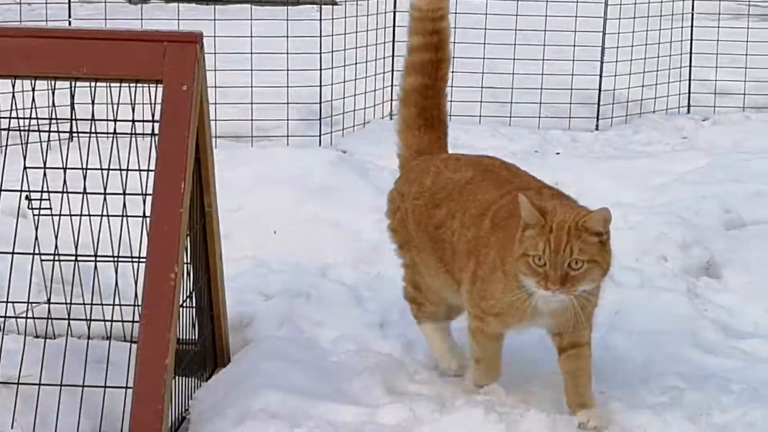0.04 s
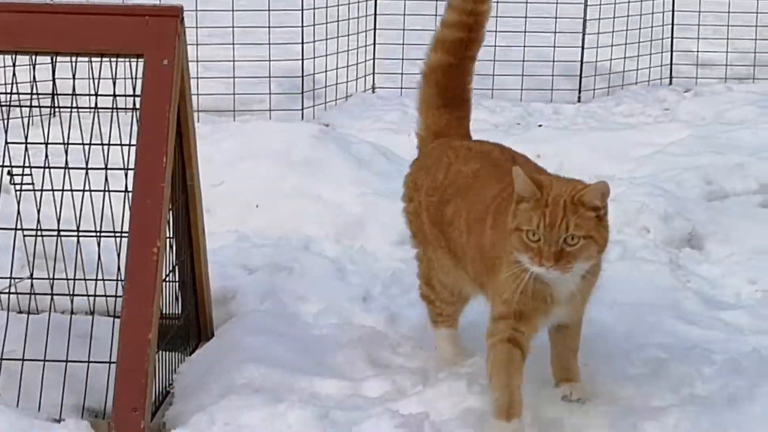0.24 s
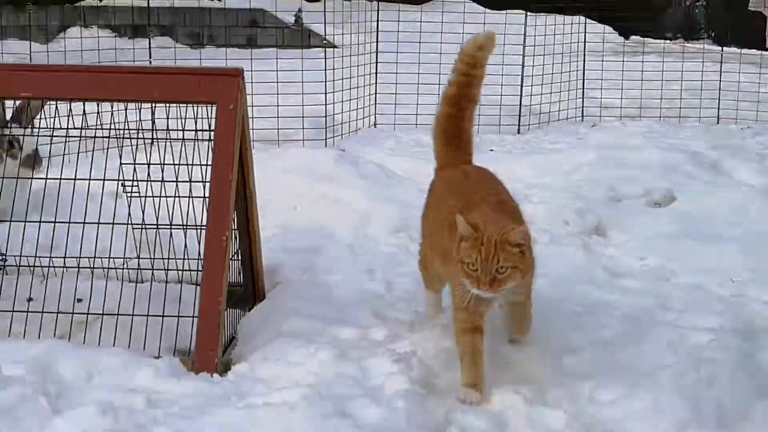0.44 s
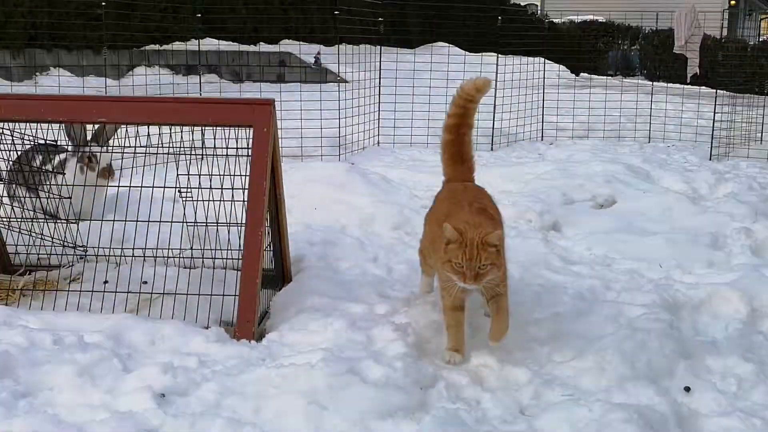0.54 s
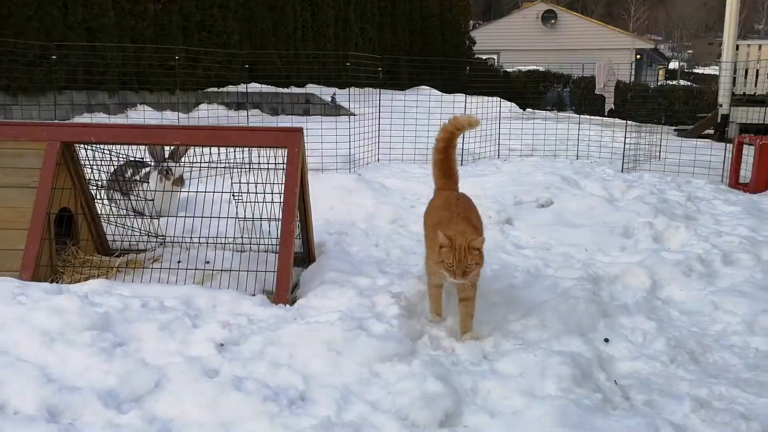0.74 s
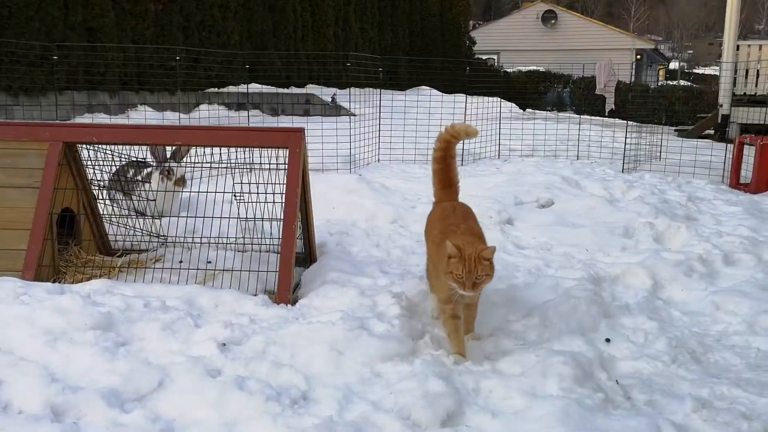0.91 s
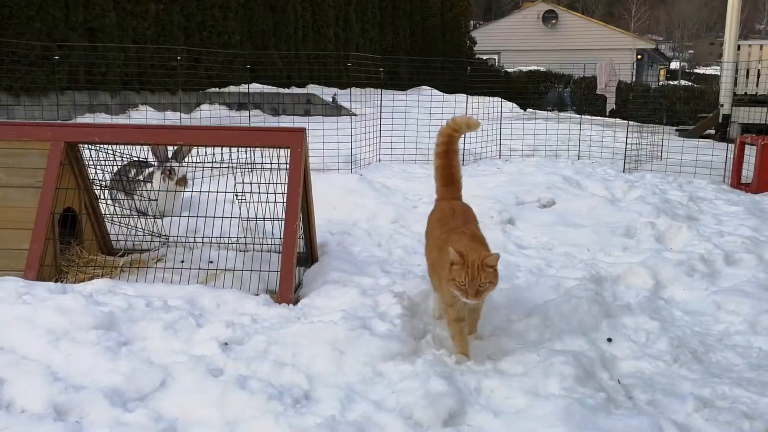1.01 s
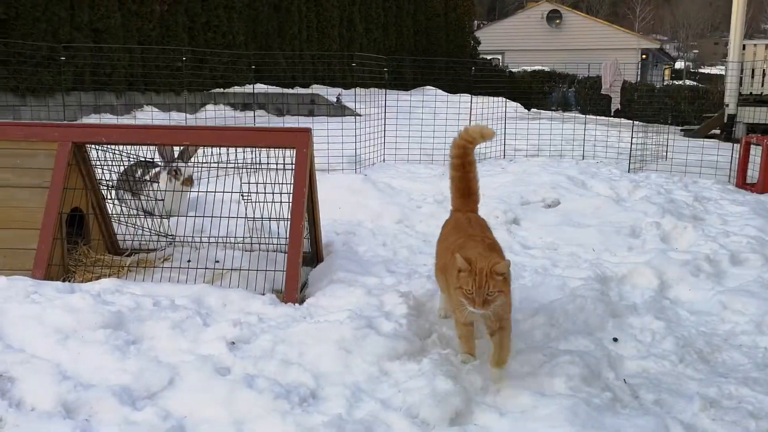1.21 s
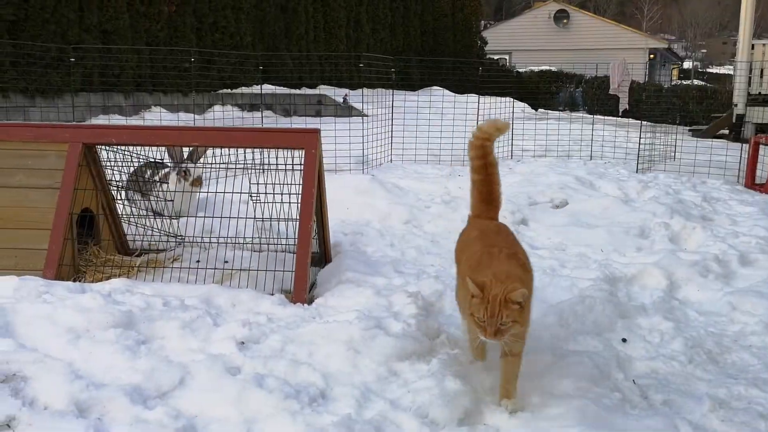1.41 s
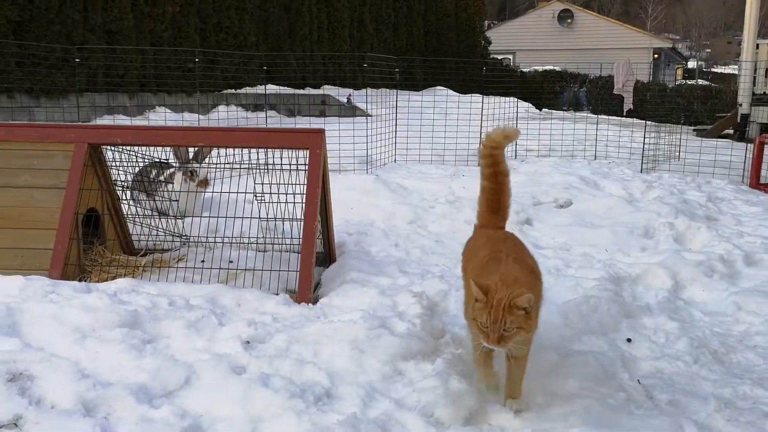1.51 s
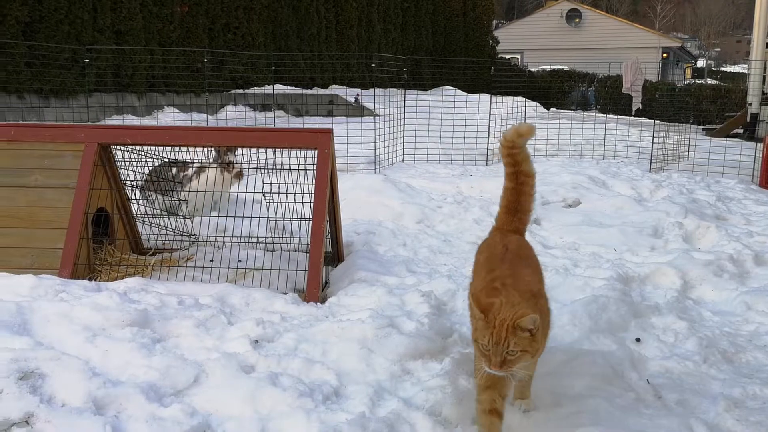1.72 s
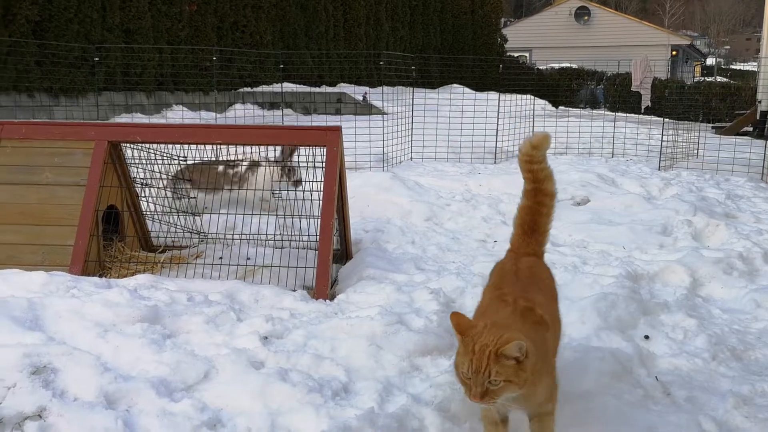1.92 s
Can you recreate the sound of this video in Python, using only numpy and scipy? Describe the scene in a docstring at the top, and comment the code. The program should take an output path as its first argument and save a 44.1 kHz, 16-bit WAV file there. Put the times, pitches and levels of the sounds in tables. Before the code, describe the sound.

Camera handling noise: a low bump and click, then a short rub and faint ticks.

```python
"""A fingertip lands on a hand-held camera: the case rings with a click and sways with a deep thump.
The skin sticks and slips as it slides across twice, then the grip settles with ticks, scuffs and bumps.
The fingers are beside the right microphone, so the left one hears them later and duller.
Behind this is the faint rush of a quiet garden, where a cat's paws crunch in the snow."""
import sys
import numpy as np
from scipy import signal
from scipy.fft import rfft, irfft, next_fast_len
from scipy.io import wavfile
from scipy.ndimage import uniform_filter1d

SR = 44100
rng = np.random.default_rng(int(sys.argv[2]) if len(sys.argv) > 2 else 0)


def dump_mix(stems):
    """Bounce the given channels to the path in sys.argv[1] as a 16-bit WAV at rate SR."""
    frames = np.atleast_2d(stems).T  # one column per channel
    limited = np.clip(frames, -1, 1)  # hard clip at full scale
    pcm = np.round(limited * 32767).astype(np.int16)
    wavfile.write(sys.argv[1], SR, pcm)


N = 85995
T = np.arange(N) / SR

# tone of the outdoor air: frequency_hz, gain_db
AIR_TONE = [(150, -30.5), (250, -4), (302, -6.5), (427, -10), (614, -9.5), (867, -6), (1100, -11),
            (1180, -14), (1890, -15), (4100, -26), (7250, -28), (15500, -39)]
# loudness of the air: time_s, level_db
AIR_LOUDNESS = [(0, -66), (0.8, -67), (1.15, -68), (1.5, -68.5), (1.8, -66), (1.95, -67)]
# how alike the air is in both microphones: frequency_hz, likeness (1 same, -1 opposite)
AIR_LIKENESS = [(250, 0.35), (640, -0.61), (1400, 0.13), (8000, -0.15)]
# how much louder the air is on the left: frequency_hz, gain_db
AIR_BALANCE = [(250, 2), (700, -4), (1300, -4), (2400, -2), (4400, 0), (8000, 3), (15000, -1)]
# the cat's steps: peak_s, level_db
PAW_STEPS = [(0.049, -79), (0.742, -83.5), (0.779, -81), (0.95, -84), (1.045, -83), (1.33, -83.5),
             (1.81, -80)]
# tone of crunching snow: frequency_hz, gain_db
SNOW_TONE = [(3000, -31), (5500, 4), (8800, 4.5), (10500, -22), (15000, -30.5)]
# loudness of the hand's rumble: time_s, level_db
RUMBLE_LOUDNESS = [(0, -47.5), (0.035, -44.5), (0.06, -38), (0.19, -30.5), (0.28, -37.5), (0.35, -46.5),
                   (1.0, -47), (1.4, -49), (1.55, -47), (1.95, -51)]
# tone of that rumble: frequency_hz, gain_db
RUMBLE_TONE = [(10, -13.5), (25, 7), (42, 1.5), (70, -5.5), (110, -14), (160, -27.5), (240, -31),
               (350, -41.5), (700, -37.5), (2000, -70.5)]
# scuffs of a shifting finger: peak_s, level_db, fade_s (every fade or swell time spans 60 dB)
FINGER_SCUFFS = [(0.418, -58, 0.14), (1.289, -59, 0.11), (1.306, -55, 0.16), (1.434, -59, 0.077),
                 (1.685, -62.5, 0.45), (1.816, -61, 0.42)]
# tone of a scuff: frequency_hz, gain_db
SCUFF_TONE = [(60, -22), (130, 8), (230, 2), (400, -9.5), (650, -11.5), (1000, -9.5), (1500, -27),
              (3000, -29), (8000, -48)]
# what the left microphone loses of any rubbing: frequency_hz, gain_db
LEFT_SHADOW = [(300, -6.5), (700, -10), (1300, -16.5), (2400, -17), (4400, -21.5), (8000, -7.5)]
# ticks of a seam in the case: start_s, level_db
SEAM_TICKS = [(1.7536, -53.5), (1.7884, -43.5), (1.8962, -55.5)]
# notes the seam rings at: pitch_hz, gain_db, fade_s
SEAM_NOTES = [(920, -4.5, 0.016), (1700, -2, 0.013), (2080, 0.5, 0.013), (2530, -1.5, 0.009)]
# loudness of the sliding fingertip, one list per stroke: time_s, level_db
SLIDE_STROKES = [
    [(0.129, -39.5), (0.142, -48), (0.18, -50.5), (0.22, -52), (0.255, -50.5), (0.3, -51), (0.325, -55.5),
     (0.365, -53), (0.43, -59.5), (0.475, -64.5), (0.5, -97)],
    [(0.515, -88), (0.54, -64), (0.58, -62), (0.63, -72.5), (0.68, -67.5), (0.74, -83)],
]
# tone of rubbing skin: frequency_hz, gain_db
RUB_TONE = [(150, -10), (350, -7.5), (620, 2), (850, -1), (1250, -2), (1700, -0.5), (2300, 0.5), (2800, -4),
            (3150, -12.5), (4500, -23), (7500, -27.5), (9500, -39.5), (12000, -37), (15000, -40)]
# tone of hard-pressed skin: frequency_hz, gain_db
SQUEEZE_TONE = [(2500, 2), (4000, 5), (6000, -5.5), (7700, 2.5), (9000, -15.5), (12000, -8), (15000, -30)]
# the skin snapping free: start_s, level_db
SKIN_SNAPS = [(0.2382, -25.5)]
# tone of the snap: frequency_hz, gain_db
SNAP_TONE = [(1000, -16), (4000, -1), (9000, -3.5), (12500, -6.5), (15000, -23.5)]
# bumps of the grip that start at once, some as strong as the thumps: start_s, level_db, pitch_hz, fade_s
GRIP_BUMPS = [(0.054, -28.5, 81, 0.08), (0.1223, -13, 96, 0.014), (0.1324, -13, 167.3, 0.022),
              (0.197, -35.5, 260, .02), (0.208, -28.5, 155, 0.029), (0.2446, -10, 81.6, 0.029),
              (0.293, -36.5, 95.4, 0.089), (0.517, -39, 47.7, 0.14), (0.631, -37, 75, 0.064),
              (0.749, -43.5, 140, 0.019), (0.777, -37, 41.4, 0.18), (1.285, -49, 119, 0.063),
              (1.308, -46.5, 132, 0.061), (1.681, -40, 131, 0.074), (1.715, -39, 42.1, 0.25),
              (1.84, -43, 123, 0.063)]
# heavy jolts of the case: peak_s, level_db, pitch_hz, swell_s, fade_s
HEAVY_THUMPS = [(0.1, -23.5, 30.9, 0.22, 0.15), (0.1433, -7.5, 51.7, 0.059, 0.048),
                (0.16, -20, 34.5, 0.01, 0.2), (0.2382, -18.5, 52.7, 0.029, 0.07),
                (0.266, -26, 24.7, 0.013, 0.133), (0.347, -31.5, 48.5, 0.074, 0.093)]
# notes the case rings at: pitch_hz, gain_db, fade_s
CASE_NOTES = [(389, -15.5, 0.022), (625, -2.5, 0.014), (1106, 1, 0.0074), (1460, 3.5, 0.0047),
              (1910, -13, 0.014), (2350, -4, 0.011), (3760, -21.5, 0.013), (4370, -21.5, 0.0047)]
# middles of the case's low, middle and high range: pitch_hz
CASE_RANGES = [650, 1346, 2350]
# taps and how hard they ring each range: start_s, low_db, middle_db, high_db, left_cutoff_hz
FINGER_TAPS = [(0.1174, -26.5, -37.5, -32.5, 376), (0.129, -18, -17, -19.5, 317),
               (0.7495, -38.5, -46.5, -69, 322)]

LEFT_DELAY_MS, TOP_HZ = 0.624, 15750
PAW_WIDTH_S, CRYSTALS_PER_S, PAW_LEFT_DB = 0.018, 1600, 10
SCUFF_SWELL_S, BUMP_RISE_S = 0.053, 0.0022
SEAM_CUTOFF_HZ, SEAM_LEFT_CUTOFF_HZ = 2700, 990
SLIPS_PER_S, RUB_FLUTTER_DB, SNAP_LEFT_DB = 4000, 1, -39
SQUEEZE_PEAK_S, SQUEEZE_WIDTH_S, SQUEEZE_DB = 0.264, 0.018, -60.5
CRACK_GAIN_DB, CRACK_FADE_S = -29.5, 0.013
FINGERTIP_CUTOFF_HZ, FINGERTIP_STEEPNESS = 5000, 12


def amp(db):
    """Turn decibels into a number to multiply by."""
    return 10 ** (np.asarray(db) / 20)


def unit(x):
    """Scale a sound so its average strength (rms) is 1."""
    return x / np.sqrt(np.mean(x ** 2) + 1e-20)


def along(points, hz):
    """Read between (frequency_hz, value) points, with octaves evenly spaced."""
    frequencies, values = np.transpose(points)
    return np.interp(np.log(hz + 1), np.log(frequencies + 1), values)


def loudness(points):
    """A gain that follows (time_s, level_db) points and is silent outside them."""
    times, levels = np.transpose(points)
    return amp(np.interp(T, times, levels, left=-120, right=-120))


def fade(t, fade_s):
    """Silent before t = 0, then dying away by 60 dB every fade_s."""
    return (t >= 0) * np.exp(-np.log(1000) * np.abs(t) / fade_s)


def swell_and_fade(t, swell_s, fade_s):
    """Grow to a peak at t = 0, then die away."""
    return np.where(t < 0, fade(-t, swell_s), fade(t, fade_s))


def ring(t, notes):
    """Fading notes struck together at t = 0, every second one flipped upside down."""
    return sum((-1) ** k * amp(db) * np.sin(2 * np.pi * hz * t) * fade(t, fade_s)
               for k, (hz, db, fade_s) in enumerate(notes))


def filtered(x, response):
    """Multiply each frequency in a sound by response(hz)."""
    size = next_fast_len(N + SR // 2)
    return irfft(rfft(x, size) * response(np.fft.rfftfreq(size, 1 / SR)), size)[..., :N]


def shaped(x, tone):
    """Give a sound the tone of a (frequency_hz, gain_db) table."""
    return filtered(x, lambda hz: amp(along(tone, hz)))


def dulled(x, cutoff_hz):
    """Gently turn down the treble above the cutoff."""
    return filtered(x, lambda hz: 1 / (1 + 1j * hz / cutoff_hz))


def microphones(left, right):
    """Make a stereo pair: the left microphone hears the case a little later."""
    late_left = filtered(left, lambda hz: np.exp(-2j * np.pi * hz * LEFT_DELAY_MS / 1000))
    return np.array([late_left, right])


def garden_air():
    """Faint outdoor rush and microphone hiss, partly alike on the two sides."""
    def spread(hz):
        angle = np.arccos(np.clip(along(AIR_LIKENESS, hz), -1, 1)) / 2
        return np.array([np.cos(angle), np.sin(angle)])
    rush = shaped(rng.standard_normal((2, N)), AIR_TONE)
    shared, opposite = filtered(rush, spread)
    pair = np.array([shared + opposite, shared - opposite])
    pair = filtered(pair, lambda hz: amp(np.outer([.5, -.5], along(AIR_BALANCE, hz))))
    return unit(pair) * loudness(AIR_LOUDNESS)


def cat_paws():
    """Snow crystals break under each soft step, off to the left."""
    crystals = rng.standard_normal((2, N)) * (rng.random((2, N)) < CRYSTALS_PER_S / SR)
    weight = sum(amp(db) * np.exp(-.5 * ((T - peak_s) / PAW_WIDTH_S) ** 2) for peak_s, db in PAW_STEPS)
    balance = amp([[PAW_LEFT_DB / 2], [-PAW_LEFT_DB / 2]])
    return unit(shaped(crystals, SNOW_TONE)) * weight * balance


def hand_rumble():
    """The moving hand shakes the whole camera."""
    shake = unit(shaped(rng.standard_normal(N), RUMBLE_TONE)) * loudness(RUMBLE_LOUDNESS)
    return microphones(shake, shake)


def finger_scuffs():
    """The flat of a finger shifts on the case: a dull brush that swells and dies away."""
    pressure = sum(amp(db) * swell_and_fade(T - peak_s, SCUFF_SWELL_S, fade_s)
                   for peak_s, db, fade_s in FINGER_SCUFFS)
    brush = unit(shaped(rng.standard_normal(N), SCUFF_TONE)) * pressure
    return microphones(shaped(brush, LEFT_SHADOW), brush)


def seam_ticks():
    """A seam of the case gives under the grip with a short, firm tick."""
    ticks = sum(amp(db) * ring(T - start_s, SEAM_NOTES) for start_s, db in SEAM_TICKS)
    treble_cut = signal.butter(8, SEAM_CUTOFF_HZ, fs=SR, output="sos")
    ticks = signal.sosfilt(treble_cut, ticks)
    return microphones(dulled(ticks, SEAM_LEFT_CUTOFF_HZ), ticks)


def finger_slide():
    """Skin sticks and slips in many tiny jerks, hisses where it presses hardest and once snaps free."""
    slips = rng.standard_normal(N) * (rng.random(N) < SLIPS_PER_S / SR)
    flutter = unit(uniform_filter1d(rng.standard_normal(N), size=600))
    strokes = sum(loudness(stroke) for stroke in SLIDE_STROKES)
    rub = unit(shaped(slips, RUB_TONE)) * strokes * amp(RUB_FLUTTER_DB * flutter)
    squeeze = amp(SQUEEZE_DB) / (1 + ((T - SQUEEZE_PEAK_S) / SQUEEZE_WIDTH_S) ** 2)
    hiss = unit(shaped(rng.standard_normal(N), SQUEEZE_TONE)) * squeeze
    spike = sum(amp(db) * (np.arange(N) == round(start_s * SR)) for start_s, db in SKIN_SNAPS)
    snap = shaped(spike, SNAP_TONE)
    left = shaped(rub + hiss, LEFT_SHADOW) + amp(SNAP_LEFT_DB) * snap
    return microphones(left, rub + hiss + snap)


def case_jolts():
    """A jolt makes the case sway up to a peak and die away; bumps of the grip start at once and ring briefly."""
    sway = np.zeros(N)
    for peak_s, db, hz, swell_s, fade_s in HEAVY_THUMPS:
        t = T - peak_s
        sway += amp(db) * np.sin(2 * np.pi * hz * t) * swell_and_fade(t, swell_s, fade_s)
    for start_s, db, hz, fade_s in GRIP_BUMPS:
        t = np.maximum(T - start_s, 0)
        rise = 1 - np.exp(-t / BUMP_RISE_S)
        sway -= amp(db) * np.sin(2 * np.pi * hz * t) * fade(t, fade_s) * rise
    return microphones(sway, sway)


def finger_taps():
    """Each tap rings the notes of the case, in a mix set by where and how flat the finger lands."""
    left, right = np.zeros(N), np.zeros(N)
    for start_s, low_db, middle_db, high_db, left_cutoff_hz in FINGER_TAPS:
        t = T - start_s
        strength = list(zip(CASE_RANGES, (low_db, middle_db, high_db)))
        notes = [(hz, db + along(strength, hz), fade_s) for hz, db, fade_s in CASE_NOTES]
        crack = amp(high_db + CRACK_GAIN_DB) * rng.standard_normal(N) * fade(t, CRACK_FADE_S)
        tap = ring(t, notes) + crack
        right += tap
        left += dulled(tap, left_cutoff_hz)
    pair = microphones(left, right)
    # the soft fingertip lets little high treble through
    return filtered(pair, lambda hz: 1 / np.hypot(1, (hz / FINGERTIP_CUTOFF_HZ) ** FINGERTIP_STEEPNESS))


def scene():
    """All the handling sounds over the quiet garden."""
    handling = case_jolts() + finger_taps() + seam_ticks() + finger_scuffs() + finger_slide()
    return handling + hand_rumble() + cat_paws() + garden_air()


def record(dry):
    """The camera keeps nothing above its highest frequency."""
    return filtered(dry, lambda hz: hz < TOP_HZ)


dry = scene()
out = record(dry)
dump_mix(out)
```